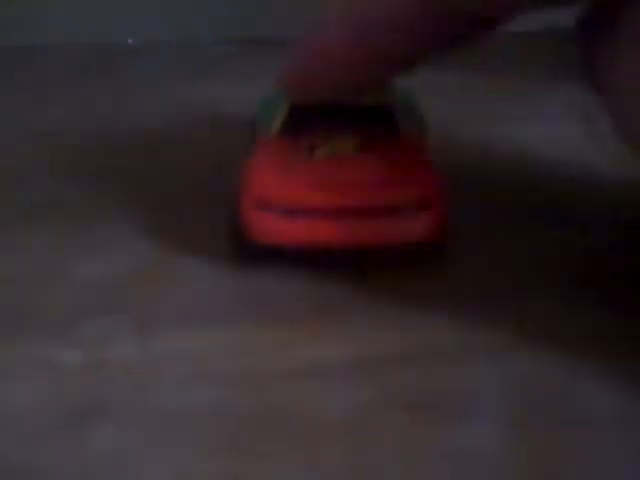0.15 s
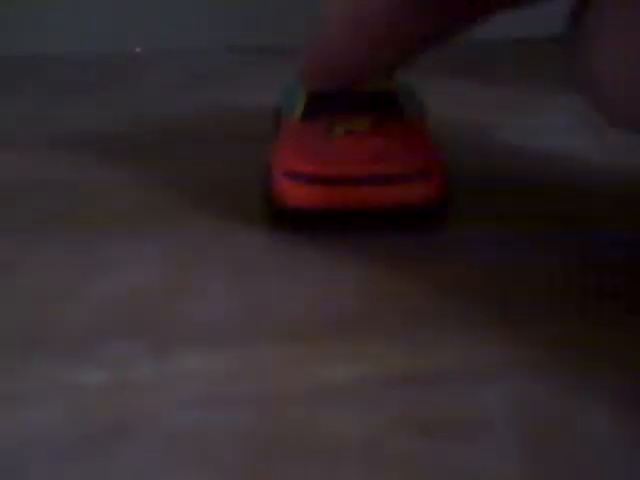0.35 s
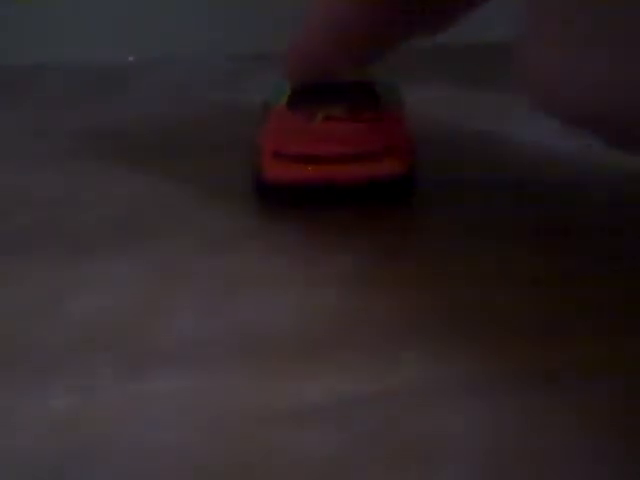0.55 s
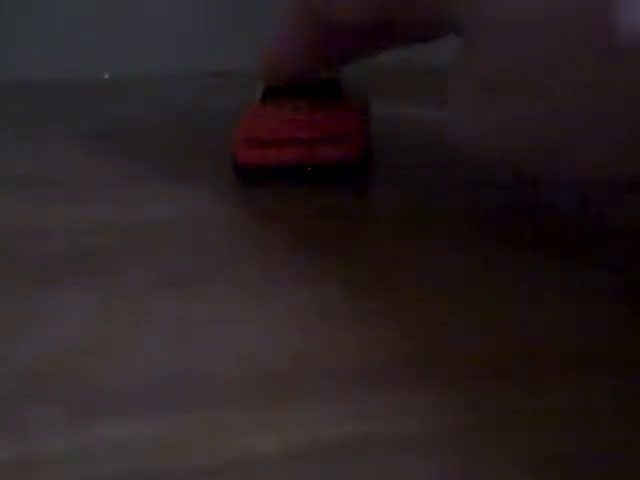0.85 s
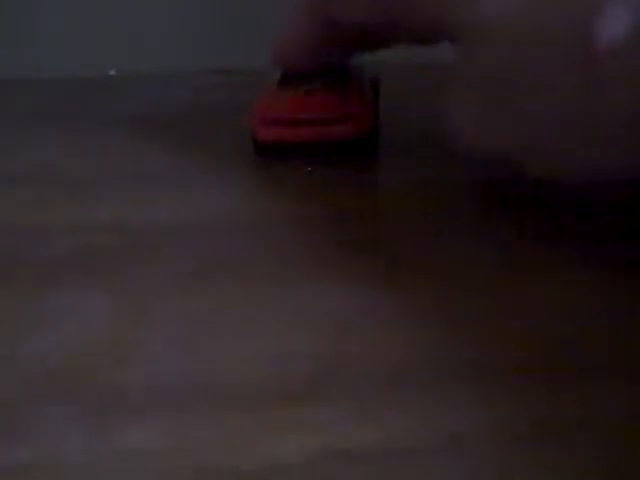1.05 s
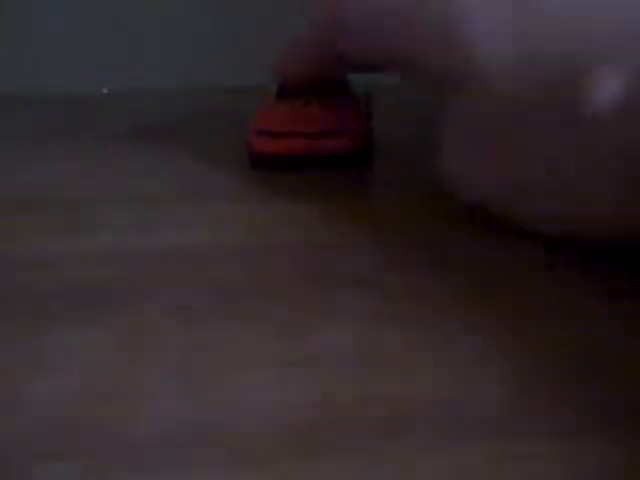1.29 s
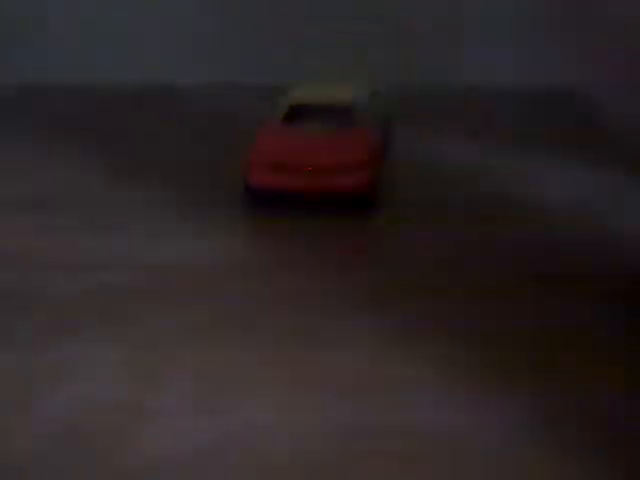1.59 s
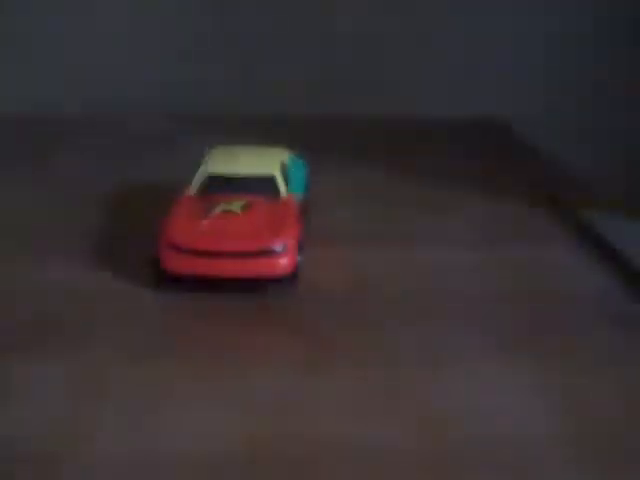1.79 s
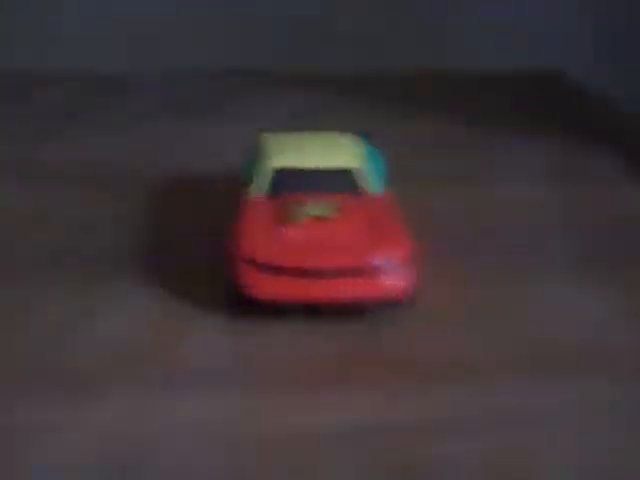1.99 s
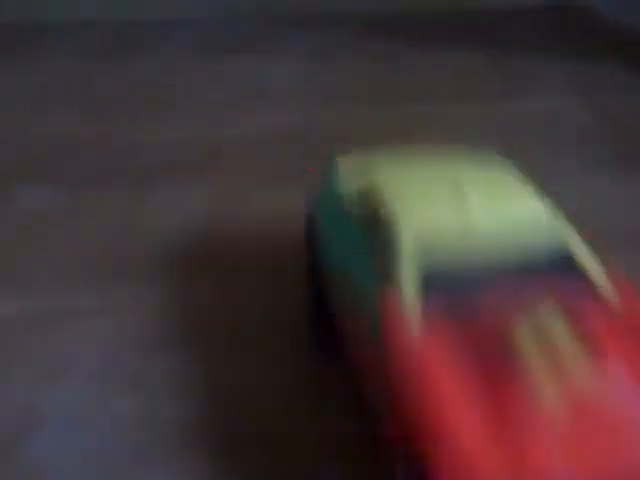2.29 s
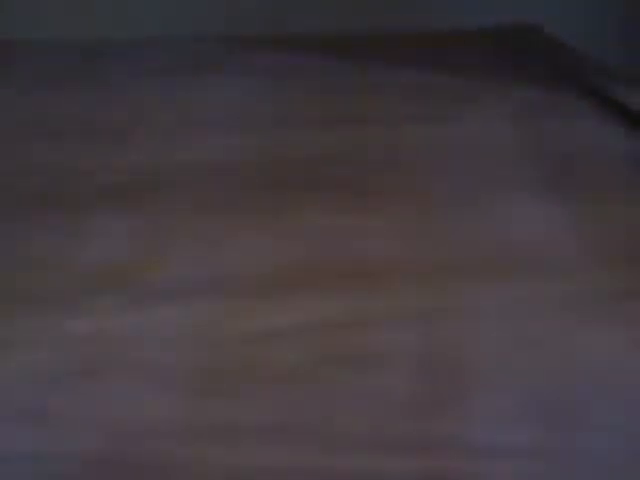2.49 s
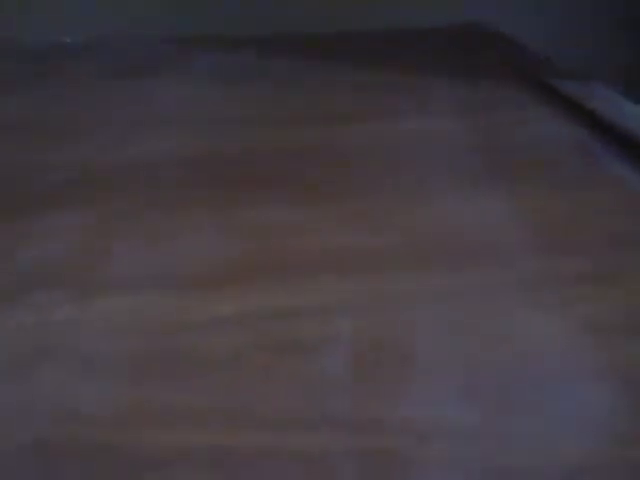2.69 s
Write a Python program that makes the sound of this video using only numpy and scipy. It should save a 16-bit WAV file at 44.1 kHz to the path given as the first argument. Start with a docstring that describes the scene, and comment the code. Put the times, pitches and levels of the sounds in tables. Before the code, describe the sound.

Pull-back toy car ratcheting, then rolling over wood with rattling gears and landing with a clatter.

```python
"""A pull-back toy car on a wooden table, close to the left microphone in a small, quiet room.
Its ratchet clicks as it is drawn backwards; let go, it rolls at the microphone with rattling gears,
the tabletop drumming under its wheels. It runs off the edge, whirs in the air and lands with a clatter.
The right microphone hears it fainter and duller, with more of the room."""
import sys
import numpy as np
from scipy import signal
from scipy.io import wavfile
from scipy.ndimage import uniform_filter1d

SR = 44100
rng = np.random.default_rng(int(sys.argv[2]) if len(sys.argv) > 2 else 0)


def transcribe(signal):
    """Save signal, clipped to [-1, 1], as a 16-bit WAV file at the path in sys.argv[1]."""
    frames = np.atleast_2d(signal).T
    limited = np.clip(frames, -1, 1)
    pcm = np.round(limited * 32767).astype(np.int16)
    wavfile.write(sys.argv[1], SR, pcm)


N = 125685
TIME = np.arange(N) / SR
BINS = np.fft.rfftfreq(8192, 1 / SR)
RELEASE_S = 1.5  # the hand lets go
KNOCK_S = 0.0017  # contact time of a knock or bump


def amp(db):
    """Decibels to gain."""
    return 10 ** (np.asarray(db) / 20)


def unit(x):
    """Scales to rms 1."""
    return x / np.sqrt(np.mean(x ** 2) + 1e-20)


def curve(points, hz=BINS):
    """Interpolates a table along log frequency."""
    point_hz, value = np.transpose(points)
    return np.interp(np.log(hz + 1), np.log(point_hz + 1), value)


def level(points):
    """Gain over time from a dB curve."""
    return amp(np.interp(TIME, *np.transpose(points)))


def peaks(modes):
    """The dB peaks that resonances add to a spectrum."""
    return sum(10 * np.log10(1 + (amp(db) ** 2 - 1) / (1 + (2 * (BINS - hz) / width) ** 2))
               for hz, width, db in modes)


def colour(x, db):
    """Minimum-phase filter with the given dB spectrum."""
    log_gain = np.log(amp(np.r_[db, db[-2:0:-1]]))
    taps = np.fft.ifft(np.exp(np.conj(signal.hilbert(log_gain)))).real[:len(BINS)]
    return signal.fftconvolve(x, taps)[:len(x)]


def add(mix, start_s, sound):
    """Mixes a sound in at a time."""
    part = mix[round(start_s * SR):][:len(sound)]
    part += sound[:len(part)]


def grains(per_s, spread_db):
    """Random tiny impacts of uneven size."""
    size = amp(spread_db * np.minimum(rng.exponential(1, N), 4))
    return size * rng.choice([-1, 1], N) * (rng.random(N) < per_s / SR)


def chatter(spectrum, per_s, spread_db, clump_s):
    """Many small tooth contacts, each a short scrape."""
    t = np.arange(SR // 50) / SR
    power = signal.fftconvolve(grains(per_s, spread_db) ** 2, np.exp(-t / clump_s))[:N]
    return unit(colour(np.sqrt(abs(power)) * rng.standard_normal(N), spectrum))


def click(db, contact_s, spectrum, decay_s, tail_db, tail_s):
    """A brief scrape that dies quickly, plus a tail from the struck body; as much energy as 5 ms at db."""
    t = np.arange(SR // 12) / SR
    after = np.maximum(t - contact_s, 0)
    attack = np.minimum(t / 0.0004, 1)
    dying = np.exp(-after / decay_s) + amp(tail_db) * np.exp(-after / tail_s)
    sound = colour(attack * dying * rng.standard_normal(len(t)), spectrum)
    return amp(db) * unit(sound) * np.sqrt(0.005 * SR / len(t))


def ring(start_s, hz, db, t60_s):
    """One struck mode dying away."""
    out, t = np.zeros(N), np.arange(SR // 4) / SR
    envelope = np.minimum(t * hz, 1) * amp(db - 60 * t / t60_s)
    add(out, start_s, envelope * np.sin(2 * np.pi * hz * t))
    return out


# Midrange of the car's body: freq_hz, share
BODY_BAND = [(400, 0.037), (1200, 0.79), (2700, 0.99), (5000, 0)]
def body(db):
    """A midrange lift or cut that makes a contact fuller or thinner."""
    return db * curve(BODY_BAND)


# Spectrum of the quiet room: freq_hz, gain_db
ROOM_TONE = [(100, -2), (200, -5.5), (1500, -13.5), (8000, -24.5), (14000, -42), (15000, -56)]
def room_tone(db):
    """A steady, low hush at one microphone."""
    return amp(db) * unit(colour(rng.standard_normal(N), curve(ROOM_TONE)))


# Decay of the small room: freq_hz, t60_s
ROOM_DECAY = [(200, 0.88), (4000, 0.18), (12000, 0.2)]
def room(x, early_db, late_db):
    """The direct sound, quick bright reflections off the table and a short diffuse tail."""
    t = np.arange(SR // 2) / SR
    hz, frame_s, noise = signal.stft(rng.standard_normal(len(t)), SR, nperseg=256)
    dying = amp(-60 * frame_s / curve(ROOM_DECAY, hz)[:, None])
    late = signal.istft(noise * dying, SR)[1][:len(t)] * np.minimum(t / 0.0025, 1)
    burst = rng.standard_normal(len(t)) * np.exp(-t / 0.0036)
    early = signal.lfilter(*signal.butter(1, 1800, "high", fs=SR), burst)
    taps = amp(early_db) * early / np.linalg.norm(early) + amp(late_db) * late / np.linalg.norm(late)
    return x + signal.fftconvolve(x, taps)[:N]


# Loss at the right microphone: freq_hz, gain_db
FAR_LOSS = [(40, -7), (125, -10.5), (300, -11.5), (4500, -14), (7000, -16), (8500, -28), (12000, -24.5)]
def far_microphone(x):
    """Farther off, the car sounds duller and arrives by two paths that trade places as it moves."""
    first, second = [room(x, early_db=-1, late_db=-4) for _ in range(2)]
    swap_hz = 6.8
    share = np.cos(np.pi * swap_hz * TIME) ** 2
    return colour(share * first + (1 - share) * second, curve(FAR_LOSS))


# Spectrum of the wooden top: freq_hz, gain_db
WOOD = [(30, -44), (125, -15), (180, -22.5), (300, -3.5), (800, -1.5), (950, -11), (1500, -11.5),
        (3000, -10.5), (8000, -69)]
# Its resonances: freq_hz, width_hz, lift_db
TABLE_MODES = [(131, 74, 4.9), (239, 18, 8.4), (312.4, 28, 8.8), (433.9, 7.1, 12.3), (518.4, 7.3, 8)]
# Extra bass once the hand lets go: freq_hz, gain_db
FREE_BASS = [(120, 15), (300, 6.5), (480, 0.5)]
# Drumming under the wheels: time_s, level_db
ROLL_LEVEL = [(.19, -47.5), (.225, -36.5), (.38, -34.5), (.61, -41.5), (.83, -40), (.99, -42.5),
              (1.08, -58), (1.29, -42.5), (1.4, -55), (1.52, -45), (1.6, -34.5), (1.83, -34.5), (1.95, -38),
              (2.54, -44), (2.62, -68)]
PRESSED_HZ, PRESSED_WIDTH_HZ, PRESSED_LIFT_DB = 510, 110, 8.2
def tabletop():
    """The wheels drum on the grain of the wood, hollower while a finger presses the car down."""
    wood = curve(WOOD) + peaks(TABLE_MODES)
    hollow = peaks([(PRESSED_HZ, PRESSED_WIDTH_HZ, PRESSED_LIFT_DB)])
    held = unit(colour(grains(per_s=330, spread_db=2.5), wood + hollow))
    free = unit(colour(grains(per_s=370, spread_db=2), wood + curve(FREE_BASS)))
    return level(ROLL_LEVEL) * np.where(TIME < RELEASE_S, held, free)


# Wheels striking the wood: start_s, level_db
WHEEL_BUMPS = [(0.257, -23.5), (0.342, -22), (0.363, -26.5), (0.452, -30.5), (1.558, -29.5), (1.595, -29),
               (1.68, -26.5), (1.744, -27), (1.797, -29), (1.822, -21.5), (1.852, -25)]
def wheel_bumps():
    """Single hard bumps of the wheels knock on the tabletop."""
    out, wood = np.zeros(N), curve(WOOD) + 0.5 * peaks(TABLE_MODES)
    for start_s, db in WHEEL_BUMPS:
        add(out, start_s, click(db, KNOCK_S, wood, decay_s=0.0038, tail_db=0, tail_s=0.035))
    return out


def tyre_squeak():
    """A tyre rubs briefly with a rising, fuzzy tone, surging each time the pawl slips."""
    start_s, end_s, surge_s = 1.02, 1.18, 0.0052
    pitch_hz, rise_hz_per_s = 725, 400
    waver_hz = 90 * unit(uniform_filter1d(rng.standard_normal(N), size=120))
    hz = pitch_hz + rise_hz_per_s * (TIME - start_s) + waver_hz
    tone = np.sin(2 * np.pi * np.cumsum(hz) / SR)
    ages = [np.maximum(TIME - s, 0) / surge_s for s, *_ in PAWL_SLIPS if start_s < s < end_s]
    return amp(-24.5) * tone * sum(age * np.exp(-age) for age in ages)


# Modes struck on landing: pitch_hz, level_db, t60_s
LANDING_MODES = [(152, -33, 0.032), (848, -45, 0.07), (1136, -25.5, 0.044), (1900, -34, 0.28)]
def landing(start_s):
    """The car hits the floor: a low thump, a knock and a ring of its shell."""
    return sum(ring(start_s, *mode) for mode in LANDING_MODES)


# Spectrum of the car's shell: freq_hz, gain_db
SHELL = [(200, -66), (600, -20), (1000, -17.5), (2000, -0.5), (6200, -8.5), (8000, -1), (9500, -14),
         (14200, -22.5), (15000, -54)]
# Blows to the whole car: start_s, relative_db, contact_s, body_db
JOLTS = [(2.4725, -12.5, 0.0051, -3), (2.4798, -10.5, 0.0034, -2), (2.491, -17, 0.0024, 7),
         (2.5331, -11, 0.0028, -4), (2.537, -12.5, 0.0024, 7), (2.63, -11, 0.0038, -8),
         (2.6967, -4, 0.0039, -10.5), (2.702, -4.5, 0.0015, -6.5), (2.707, -10.5, 0.0017, -6),
         (2.72, -12, 0.0045, -2), (2.726, -12.5, 0.0019, 3)]
def jolts(gain_db):
    """The shell clatters as the car bumps over the table's edge and lands."""
    out, shell = np.zeros(N), curve(SHELL) + 0.62 * peaks(CHASSIS_MODES)
    for start_s, db, contact_s, body_db in JOLTS:
        spectrum = shell + body(body_db)
        blow = click(db + gain_db, contact_s, spectrum, decay_s=0.0036, tail_db=-19, tail_s=0.036)
        add(out, start_s, blow)
    return out


# Modes of the steel axle: pitch_hz, level_db, t60_s
AXLE_MODES = [(4686, -19.5, 0.06), (5500, -10, 0.018)]
def axle(ping_s):
    """The axle pings as the gears take hold; once let go, each knock rings it, soft nearly as hard."""
    ping = sum(ring(ping_s, *mode) for mode in AXLE_MODES)
    pitch_hz, sag_hz = AXLE_MODES[0][0], 130
    return ping + sum(ring(s, pitch_hz - sag_hz * rng.random(), db=-21 + 0.17 * knock_db, t60_s=0.019)
                      for s, knock_db in KNOCKS if s > RELEASE_S)


# Spectrum of the chassis: freq_hz, gain_db
CHASSIS = [(150, -54), (600, -19.5), (1300, -21.5), (1800, -18), (2100, -10.5), (3000, -12.5), (4000, -9.5),
           (5200, -6), (6500, -7), (8200, -6.5), (9300, -12), (14000, -42.5)]
# Its resonances: freq_hz, width_hz, lift_db
CHASSIS_MODES = [(2080, 150, 5), (2530, 175, 7.5), (3510, 180, 7), (4580, 122, 12), (6030, 120, 3.5),
                 (7310, 377, 15.5)]
# Loose parts striking it: start_s, relative_db
KNOCKS = [(0.169, -21.5), (0.223, -31.5), (0.242, -34), (0.313, -22), (0.342, -16), (0.355, -28),
          (0.396, -22), (0.439, -17), (0.471, -21), (1.508, -33.5), (1.567, -34.5), (1.654, -17.5),
          (1.669, -19.5), (1.697, -16.5), (1.732, -8.5), (1.767, -17), (1.789, -15), (1.798, -21),
          (1.823, -29), (1.839, -10), (1.847, -11.5), (1.862, -10.5), (1.909, -14), (1.917, -15),
          (1.925, -12), (1.933, -12), (1.94, -12), (1.951, -9), (1.962, -12.5), (1.973, -8.5),
          (1.98, -13.5), (1.988, -9.5), (2.005, -11.5), (2.013, -11.5), (2.027, -11.5), (2.042, -12),
          (2.049, -15), (2.057, -15), (2.075, -13.5), (2.09, -9.5), (2.095, -9), (2.101, -7), (2.111, -13),
          (2.122, -10.5), (2.148, -14), (2.164, -8), (2.19, -12.5), (2.234, -10), (2.259, -15),
          (2.271, -14), (2.289, -13), (2.306, -19), (2.318, -12.5), (2.334, -10), (2.348, -15),
          (2.359, -16.5), (2.381, -20), (2.394, -11.5), (2.414, -11.5), (2.427, -11.5), (2.433, -13)]
def rattle(gain_db):
    """Loose gears and axles knock in the chassis."""
    out, chassis = np.zeros(N), curve(CHASSIS) + peaks(CHASSIS_MODES)
    for start_s, db in KNOCKS:
        knock = click(db + gain_db, KNOCK_S, chassis, decay_s=0.00082, tail_db=-11, tail_s=0.0093)
        add(out, start_s, knock)
    return out


# Chatter of the gear teeth: time_s, level_db
GEAR_LEVEL = [(0, -42), (.08, -53.5), (.25, -43.5), (.35, -34), (.62, -42.5), (1.33, -43), (1.41, -52.5),
              (1.46, -36.5), (1.53, -55.5), (1.65, -30.5), (1.8, -21.5), (1.97, -24), (2.44, -22),
              (2.52, -38), (2.57, -36), (2.62, -46.5)]
# Wheels spinning freely past the edge: time_s, level_db
SPIN_LEVEL = [(2.5, -45), (2.58, -43), (2.69, -22.5), (2.75, -41), (2.8, -49), (2.85, -35.5)]
# Spectrum of their whir: freq_hz, gain_db
WHIR = [(600, -35), (2200, -1), (6300, 3.5), (7700, 15.5), (9500, 2.5), (14000, -5), (15000, -64)]
def gears():
    """Fine tooth chatter: dry while winding, ringing in the chassis while rolling, a thin whir in air."""
    modes = peaks(CHASSIS_MODES)
    winding = chatter(curve(PAWL) + 0.5 * modes + body(7.5), per_s=290, spread_db=2, clump_s=0.001)
    rolling = chatter(curve(CHASSIS) + modes + body(6.6), per_s=490, spread_db=2.5, clump_s=0.00067)
    spinning = chatter(curve(WHIR), per_s=2300, spread_db=4, clump_s=0.001)
    teeth = level(GEAR_LEVEL) * np.where(TIME < RELEASE_S, winding, rolling)
    off_table = TIME > SPIN_LEVEL[0][0]
    return teeth + level(SPIN_LEVEL) * spinning * off_table


# Spectrum of the pawl on plastic teeth: freq_hz, gain_db
PAWL = [(150, -40), (500, -22), (1400, -17.5), (2100, -10.5), (2700, -14.5), (4300, -8.5), (6000, -5),
        (7200, -2.5), (8500, -4.5), (10000, -12.5), (12000, -17.5), (14000, -20.5), (15500, -46)]
# Ratchet clicks: start_s, relative_db, pitch_hz, body_db
PAWL_SLIPS = [(0.022, -27, 8400, 6.5), (0.1794, -13.5, 7000, 7), (0.2586, -20, 7200, 11.5),
              (0.2873, -26.5, 7060, 8), (0.3258, -10, 5820, 5), (0.3759, -4, 8260, -0.5),
              (0.4032, -7, 8530, -1), (0.4357, -9, 8400, -1.5), (0.4667, -10, 9000, 1.5),
              (0.5037, -8.5, 7940, 0.5), (0.5316, -11, 8360, -2), (0.5582, -13, 8200, -1.5),
              (0.5844, -10.5, 7800, -6.5), (0.6209, -15.5, 8200, -10), (0.6685, -13, 8300, 4.5),
              (0.698, -11, 8400, -5), (0.7322, -14, 8400, -2.5), (0.7666, -13, 7250, 1),
              (0.795, -12, 7500, 1.5), (0.824, -15, 8200, 4), (0.8506, -13.5, 7000, 3),
              (0.878, -14, 6840, 3.5), (0.9101, -14, 8100, 2), (0.941, -15.5, 7840, -1.5),
              (0.967, -16, 7540, 7), (1.0023, -13, 7200, 1.5), (1.0394, -12, 7100, 3.5),
              (1.0745, -11.5, 7440, 5), (1.115, -12.5, 7600, 5), (1.1568, -14.5, 7700, -0.5),
              (1.204, -14, 7950, 3), (1.2372, -12, 6640, -2.5), (1.2764, -9.5, 7900, -3.5),
              (1.3436, -11, 7500, -1), (1.44, -28, 8200, -4)]
def ratchet(gain_db):
    """The pawl slips tooth by tooth as the spring is wound, each click ringing at its own pitch."""
    out, width_hz, lift_db = np.zeros(N), 850, 9.5
    for start_s, db, pitch_hz, body_db in PAWL_SLIPS:
        modes = [(pitch_hz, width_hz, lift_db)] + CHASSIS_MODES[:3]
        spectrum = curve(PAWL) + peaks(modes) + body(body_db)
        scrape_s = 0.0031 * rng.uniform(0.45, 1)
        slip = click(db + gain_db, scrape_s, spectrum, decay_s=0.0025, tail_db=-10, tail_s=0.0025)
        add(out, start_s, slip)
    return out


def scene():
    """The car's run and fall, close on the left microphone and farther from the right, over room tone."""
    works = ratchet(gain_db=-0.5) + rattle(gain_db=-1.5) + axle(ping_s=0.181) + gears()
    car = works + tabletop() + wheel_bumps() + tyre_squeak()
    fall = jolts(gain_db=-3.5) + landing(start_s=2.698)
    near = room(car + fall, early_db=-20, late_db=-13.5)
    left = np.r_[0, near[:-1]]  # one sample later
    right = far_microphone(car + amp(2) * fall)
    return np.array([left + room_tone(db=-53.5), right + room_tone(db=-55.5)])


def record(dry):
    """The loudest clicks overload; then the top of the treble is cut."""
    clipped = np.clip(dry, -1, 1)
    cutoff_hz = 15500
    lowpass = signal.firwin(255, cutoff_hz, window=("kaiser", 8), fs=SR)
    return signal.oaconvolve(clipped, lowpass[None], "same")


dry = scene()
out = record(dry)
transcribe(out)
```